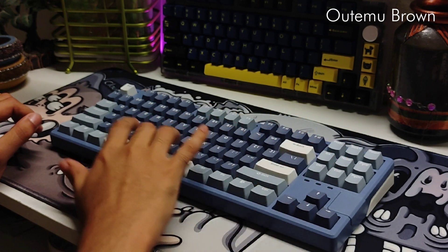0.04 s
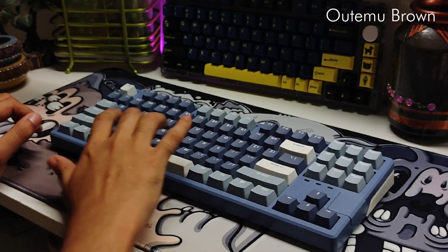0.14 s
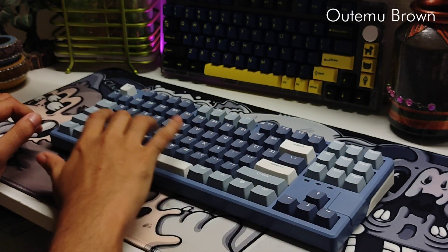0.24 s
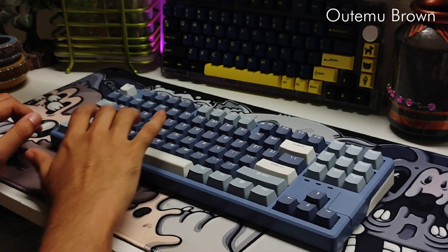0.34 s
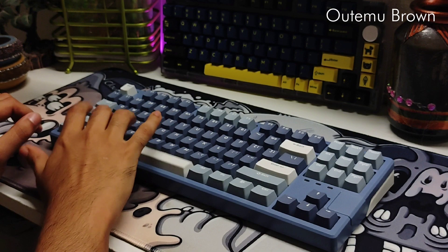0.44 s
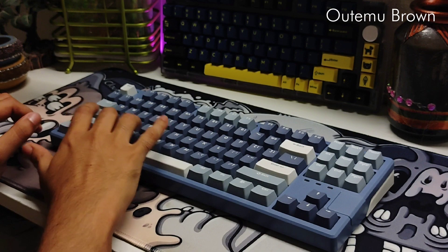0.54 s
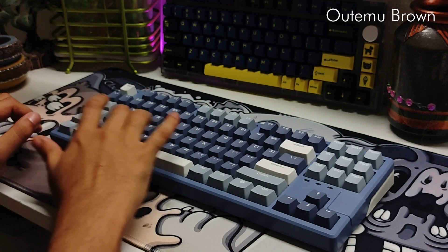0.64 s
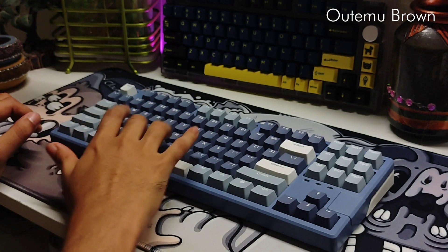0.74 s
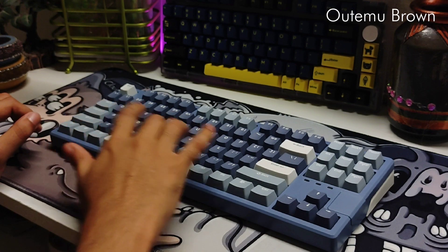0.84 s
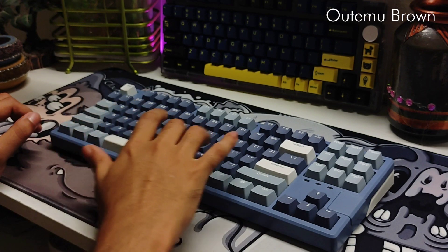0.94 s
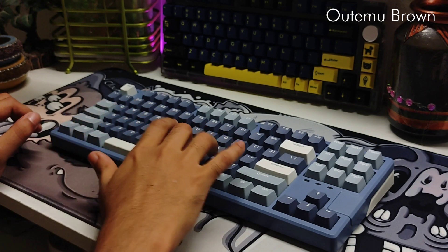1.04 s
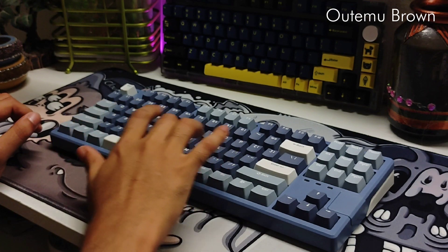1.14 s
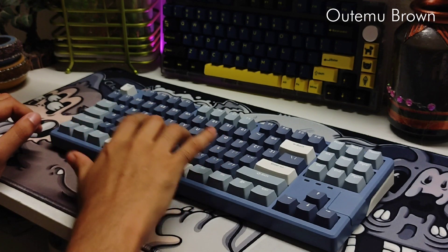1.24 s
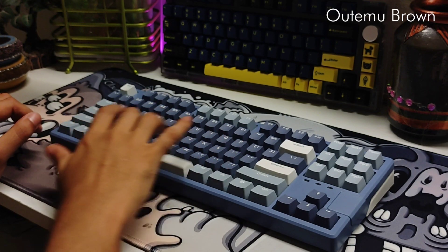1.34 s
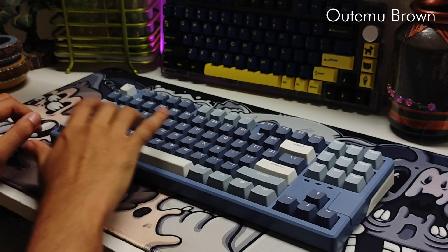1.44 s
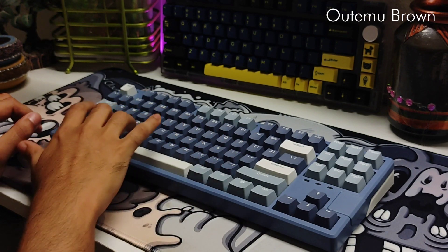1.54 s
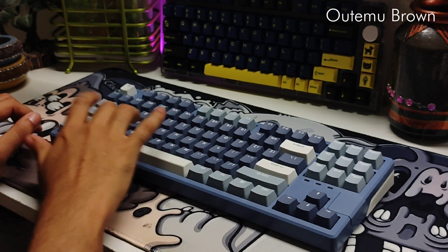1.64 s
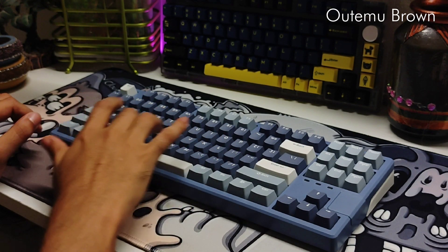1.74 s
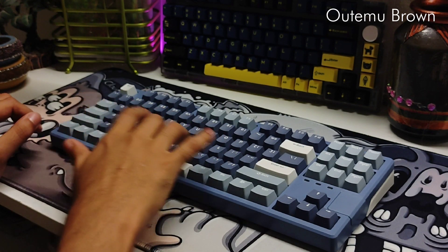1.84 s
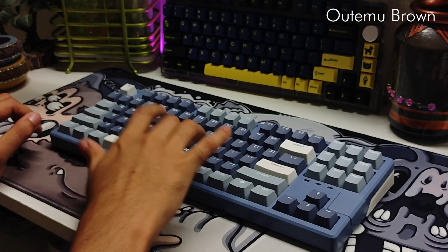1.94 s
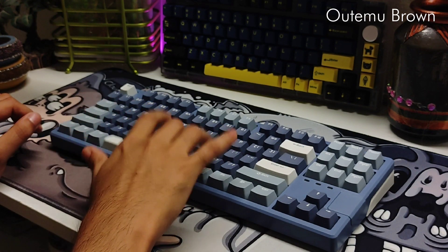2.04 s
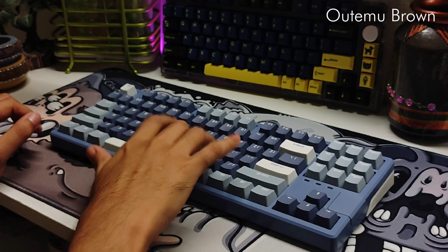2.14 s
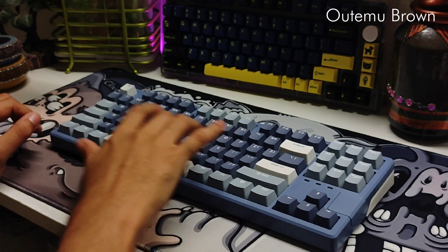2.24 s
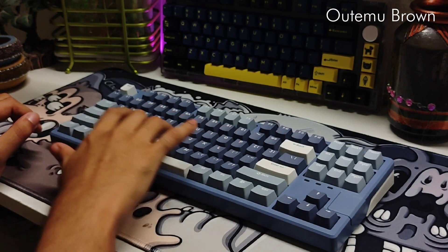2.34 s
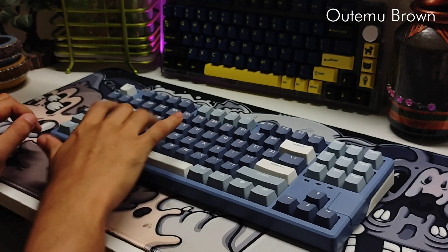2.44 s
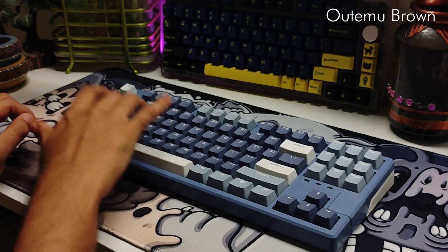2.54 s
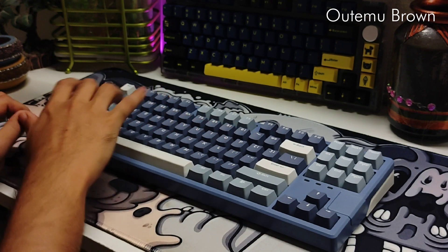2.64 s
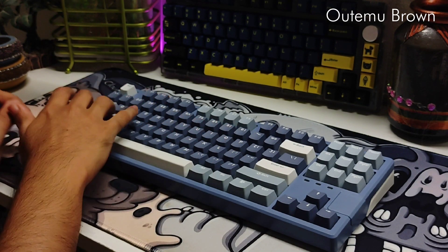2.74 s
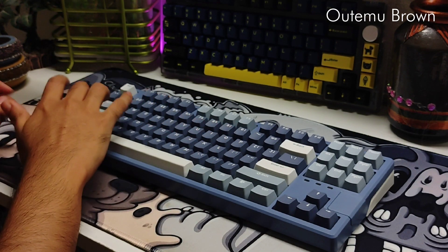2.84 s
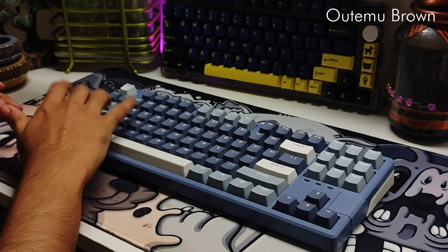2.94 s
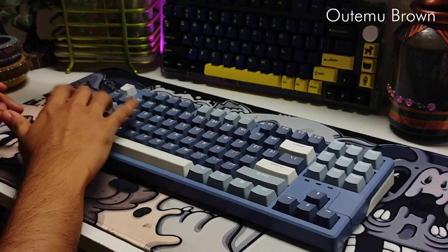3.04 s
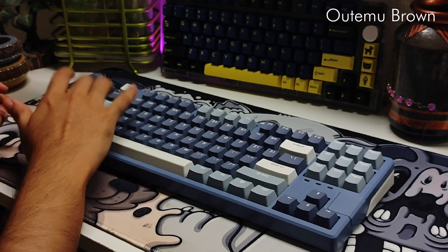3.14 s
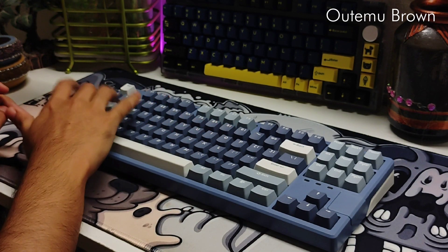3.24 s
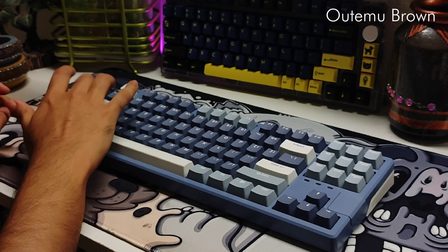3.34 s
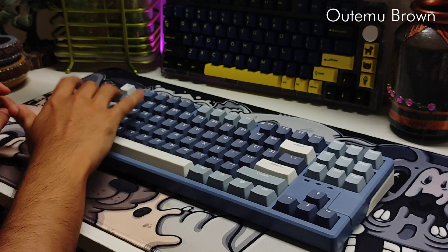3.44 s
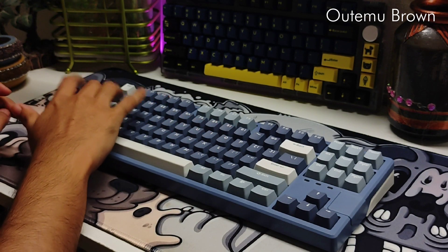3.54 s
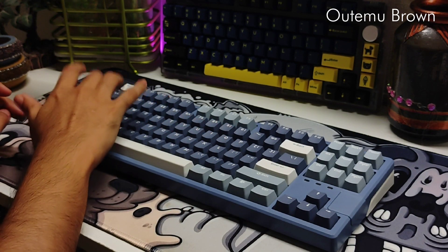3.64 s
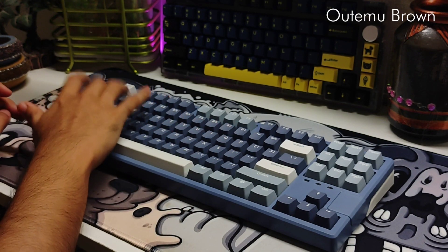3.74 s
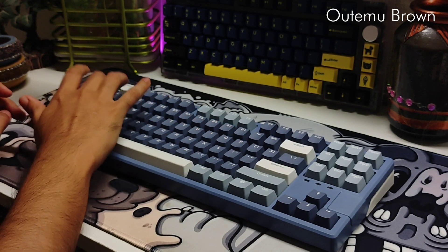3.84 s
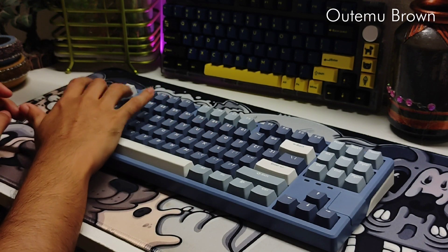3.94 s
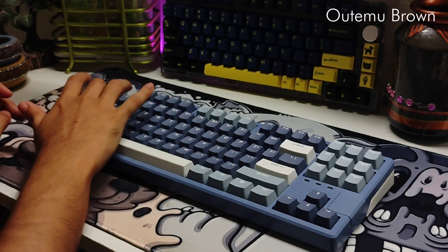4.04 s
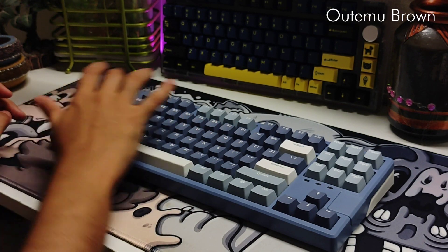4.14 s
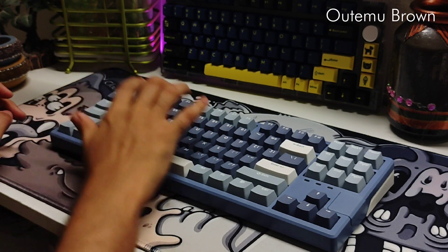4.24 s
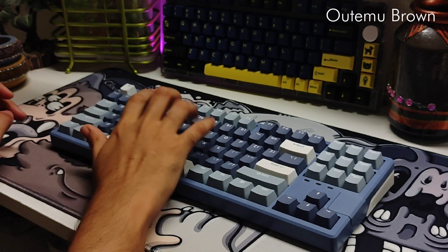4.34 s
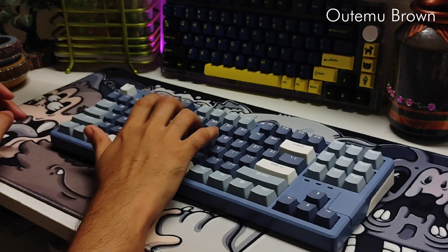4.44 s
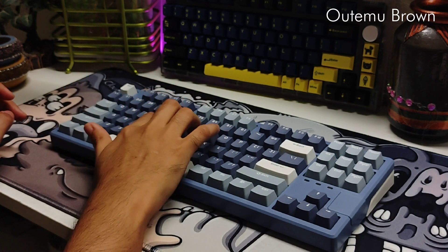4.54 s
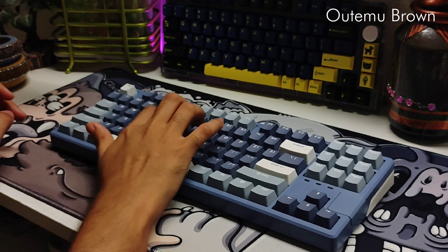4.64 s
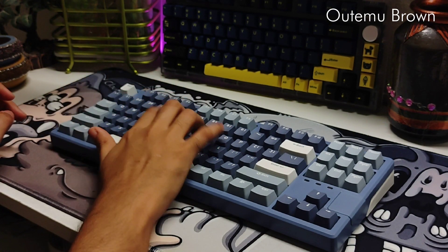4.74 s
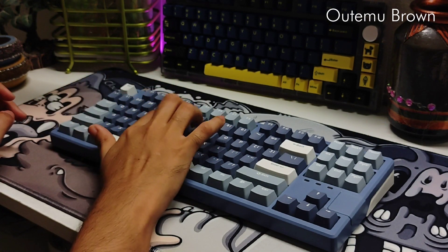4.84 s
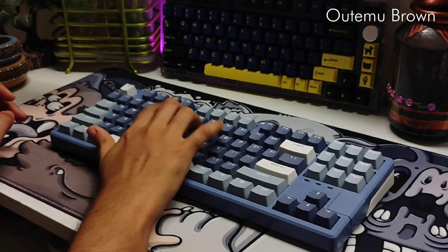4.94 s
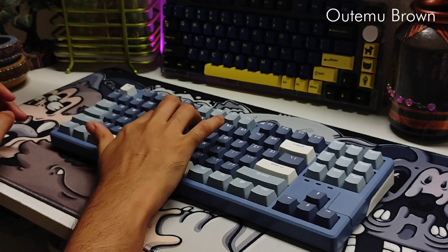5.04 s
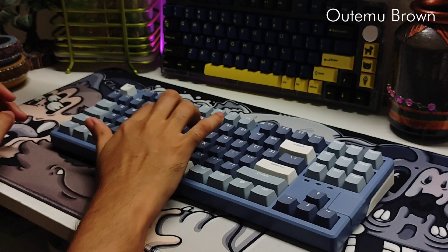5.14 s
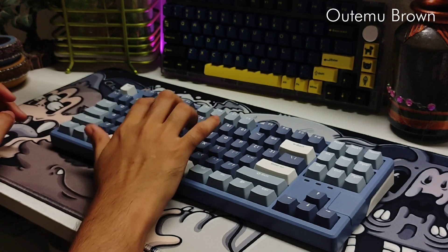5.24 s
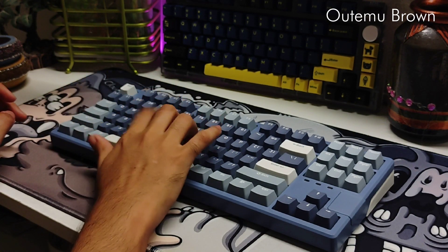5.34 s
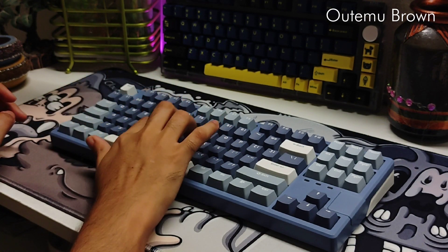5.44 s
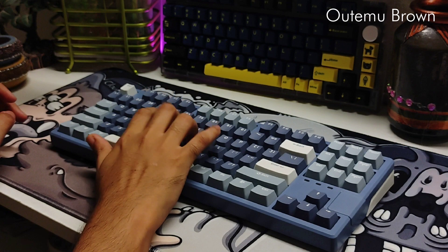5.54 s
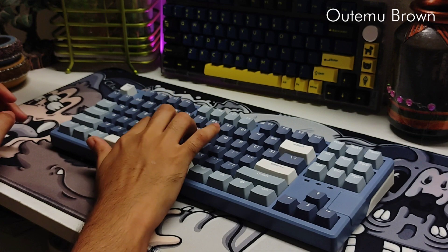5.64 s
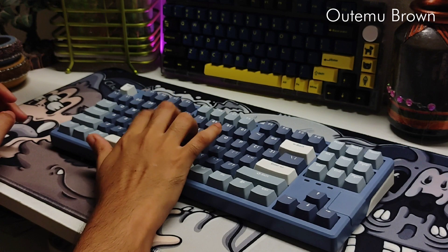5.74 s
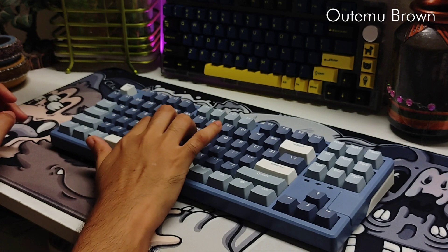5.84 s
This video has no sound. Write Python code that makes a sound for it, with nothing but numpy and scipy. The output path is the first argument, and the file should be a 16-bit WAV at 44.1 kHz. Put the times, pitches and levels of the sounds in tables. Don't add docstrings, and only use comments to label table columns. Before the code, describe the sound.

A mechanical keyboard is tapped with one hand in a quiet room. The long bar is hit about six times a second with full, rattly clacks and sharp returns; then eight crisper top-row strokes, one especially bright; after a brief gap, lighter paired letter taps in bursts. Low case and desk thumps sit beneath. Close mono microphone, short soft room tail, low hum.

```python
import sys
import numpy as np
from scipy import signal
from scipy.fft import rfft, irfft, next_fast_len
from scipy.io import wavfile
from scipy.ndimage import uniform_filter1d

SR = 44100
rng = np.random.default_rng(int(sys.argv[2]) if len(sys.argv) > 2 else 0)


def inscribe(sig):
    pcm = np.round(np.clip(np.atleast_2d(sig).T, -1, 1) * 32767)
    wavfile.write(sys.argv[1], SR, pcm.astype(np.int16))


def attenuation_scalar(level_db):
    decades = np.asarray(level_db, float) / 20
    return 10 ** decades


N = 260171

HAND_MOVES = [2.65, 4.3]
KEY_MOVES = [2.65, 3.72, 4.3]

# [f/Hz, width/Hz, level/dB on the long bar, top row, letters]
CAP_MODES = [(543, 75, 14, 7, 0), (890, 365, 3.5, -2, 2), (1399, 182, 3, -8, -11), (1782, 220, 2, -7, -4),
             (2200, 290, -6, -20, -6.5), (2974, 287, 4.5, -10, 1), (2990, 1050, 2, -9.5, -1.5)]
# [f/Hz, width/Hz, level/dB on the long bar, top row, corner key, letters]
STEM_MODES = [(4250, 420, 16, 12.5, 8, 4), (5190, 140, 12.5, 10, 9, 2.5), (6120, 690, 8, 8.5, 2, 5.5),
              (7400, 770, 10.5, 5, -24, 10.5), (8720, 306, 9.5, 7.5, -9, 15),
              (10290, 240, -25, 8.5, 14.5, -18), (11160, 3300, 6.5, 0, -6.5, -28),
              (13400, 1200, -36.5, -29.5, -23.5, 2)]
# [f/Hz, width/Hz, level/dB on the long bar, top row, corner key, letters]
SPRING_MODES = [(3300, 25, -4, -20, -25, -14), (3390, 12, 0, -20, -25, -14), (4460, 20, -7, -26, -30, -20),
                (5110, 7, -11, -5, -2, -24), (6250, 14, -10, -3, -16, -16), (6625, 8, -14, -14, -2, -20),
                (6705, 5, -12, -10, 0, -18), (6790, 7, -14, -14, -5, -18), (7430, 18, -8, -1, -20, -10),
                (7900, 14, -6, -14, -25, -8), (8520, 10, -12, -14, -20, -3), (8720, 8, -9, -8, -20, 1),
                (9020, 13, -12, -5, -22, -6), (10350, 12, -18, -16, -6, -26)]
# [f/Hz, width/Hz, level/dB on the long bar, top row, letters]
CASE_MODES = [(176, 83, 3, 5, 2), (213.3, 99.5, 3, 2, 3.5), (272.4, 66, -2.5, 0, -4.5),
              (414, 62, -21, -0.5, -16.5)]
# [f/Hz, width/Hz, level/dB on the long bar, top row, letters]
DESK_MODES = [(41, 16, 2, -2.5, 2.5), (55.7, 33, 0, -9, 6.5), (68, 22.6, -3, -3, -3.5),
              (117, 33, -4, -12.5, -20)]

# [f/Hz, 60 dB decay t/s]
ROOM_DECAY = [(200, 0.53), (1000, 0.43), (2500, 0.13), (7000, 0.094), (14000, 0.0076)]
# [f/Hz, level/dB per Hz]
HUM_SPECTRUM = [(20, 7.5), (98, 1), (177, -10.5), (388, -16), (897, -29.5), (1960, -30.5), (3740, -52.5),
                (11800, -71.5)]
# [t/s, level/dB]
RUB_LEVEL = [(0.0, -46), (0.41, -49.5), (0.9, -49), (1.3, -48), (1.45, -46.5), (1.58, -52.5), (1.78, -45),
             (1.93, -48), (2.41, -47.5), (2.6, -49), (3.75, -41.5), (4.4, -56.5), (4.76, -43), (4.98, -49),
             (5.16, -61), (5.3, -50), (5.5, -43), (5.9, -49.5)]
# [f/Hz, width/Hz, level/dB on the long bar, level/dB on the small keys]
RUB_BANDS = [(2620, 4800, 14.5, 4), (6700, 5400, -11, 2), (8020, 2100, 11, -1), (8750, 870, -6.5, -2),
             (12000, 2200, 8.5, -17.5), (14000, 2000, 1.5, -21.5)]

# [t/s, cap clack level/dB, stem tick level/dB, cap ring f/Hz, stem ring f/Hz]
BAR_PRESSES = [(0.0246, -17.5, -29, 2020, 4370), (0.2179, -29.5, -43, 1350, 4270.0),
               (0.3994, -31, -47, 2040, 4430.0), (0.557, -30, -52, 1990, 4400),
               (0.7117, -24, -33.5, 1970.0, 4540.0), (1.0283, -21, -61, 2000, 4440.0),
               (1.2188, -18, -56, 2130, 3970), (1.386, -28, -34.5, 2040, 4200),
               (1.5362, -22, -28.5, 1980, 4250), (1.702, -20.5, -28, 2620, 4300),
               (1.8558, -29, -44, 2210, 4000), (2.0005, -17.5, -68, 2060, 4240.0),
               (2.1652, -15.5, -63, 2740, 4250.0), (2.34, -33.5, -49, 1350, 4110.0),
               (2.4594, -17, -16.5, 2480, 4180)]
# [t/s, cap clack level/dB, stem tick level/dB, cap ring f/Hz, stem ring f/Hz]
BAR_RELEASES = [(0.0725, -17.5, -13, 2480, 6700), (0.3024, -26, -20, 2480.0, 4840),
                (0.482, -33.5, -28, 2750, 3950), (0.6353, -23.5, -18.5, 3140, 4880),
                (0.803, -22, -17.5, 1940, 8250), (0.974, -31, -23, 2720, 6240),
                (1.1295, -27, -17.5, 2070, 6540), (1.3068, -23, -16.5, 2800, 8750.0),
                (1.471, -31.5, -26.5, 3600, 4730), (1.632, -30, -25, 2180, 6660),
                (1.937, -26, -21, 3140, 6640), (2.0777, -19.5, -13.5, 2860, 7960),
                (2.2571, -23.5, -14.5, 1330, 6420), (2.555, -21.5, -15.5, 1370, 5000)]
# [t/s, cap clack level/dB, stem tick level/dB, cap ring f/Hz, stem ring f/Hz]
TOP_PRESSES = [
    (2.748, -12.5, -18.5, 2000, 5020),
    (2.9064, -19, -19, 3450, 4150),
    (3.0528, -15.5, -14, 3580, 4200),
    (3.2644, -19.5, -19, 1910, 4960),
    (3.425, -21.5, -23, 1860, 3800),
    (3.5617, -20.5, -19.5, 1900, 4870),
    (3.771, -15.5, -10, 1900, 6750),
    (3.935, -22.5, -20, 1920, 6630),
]
# [t/s, cap clack level/dB, stem tick level/dB, cap ring f/Hz, stem ring f/Hz]
TOP_RELEASES = [
    (2.8292, -26.5, -23.5, 1760, 9060),
    (2.986, -25.5, -23.5, 1970, 4500),
    (3.142, -18, -17, 1760, 7300),
    (3.3313, -22, -15.5, 1850, 7630),
    (3.4924, -22.5, -17, 2050, 9150),
    (3.6466, -21, -13, 1900, 8870),
    (3.8438, -27, -14, 1730, 6540),
    (4.094, -30.5, -19.5, 1826, 6640),
]
# [t/s, cap clack level/dB, stem tick level/dB, cap ring f/Hz, stem ring f/Hz]
LETTER_PRESSES = [(4.491, -25, -30.5, 1890, 8900), (4.553, -26.5, -36, 2090.0, 7000),
                  (4.7359, -22, -28, 1940, 3740), (4.79, -26, -32, 2070, 8800),
                  (4.9403, -25, -29.5, 2000, 8600), (4.993, -19, -20.5, 2090, 9500),
                  (5.358, -30, -45, 2080, 8650.0), (5.3948, -20, -18.5, 3010, 8500),
                  (5.5851, -26.5, -36, 2050, 8550.0), (5.6328, -28, -38, 2250, 8250),
                  (5.8015, -25, -34.5, 2250, 8300), (5.856, -26.5, -38, 2250, 8500)]
# [t/s, cap clack level/dB, stem tick level/dB, cap ring f/Hz, stem ring f/Hz]
LETTER_RELEASES = [
    (4.613, -29.5, -24, 1890, 8770),
    (4.647, -29, -26, 1900, 6800),
    (4.8405, -28, -18.0, 2200, 8770.0),
    (4.8933, -25, -16.5, 1890, 6900),
    (5.067, -35.5, -28, 2040, 8900),
    (5.1129, -27, -24.5, 2080, 8400),
    (5.4561, -26.5, -20.5, 2050, 8400),
    (5.4952, -29.5, -26, 2200, 6700),
    (5.696, -26.5, -21.5, 2200, 8400),
    (5.7348, -28, -25, 2320, 6670),
]

RATTLE_DECAY = [13, 11, 14, 21, 16.1, 18]
SPRING_LEVEL = [-22.5, -22, -37.5, -26, -29, -22]
# [low level/dB against the clack, high level/dB against the tick]
WASH_LEVEL = [(-29, -28.5), (-33, -37), (-32, -35), (-32.5, -38.5), (-28, -32), (-27.5, -35.5)]

# [t/s, desk boom level/dB, case thump level/dB]
LONG_BAR_THUMPS = [(0.022, -29, -28.5), (0.0717, -40.5, -24.5), (0.2184, -34, -29.5), (0.3031, -37, -25),
                   (0.3994, -38, -28), (0.483, -45, -29), (0.557, -33, -29), (0.6352, -37, -23),
                   (0.711, -35.5, -25), (0.802, -39, -24.5), (0.975, -41, -28), (1.0293, -32.5, -29),
                   (1.1286, -40, -25.5), (1.2177, -31.5, -29), (1.3052, -37, -25), (1.386, -31.0, -28.5),
                   (1.471, -46, -27), (1.5336, -31.5, -25.5), (1.632, -39, -26.5), (1.7, -32, -26),
                   (1.8548, -35.5, -30.5), (1.936, -38, -25.5), (2.0002, -35, -29.5),
                   (2.0781, -37.5, -24.5), (2.1631, -30.5, -26.5), (2.2563, -37, -26), (2.339, -35, -29),
                   (2.4597, -24.5, -24.5), (2.5543, -40, -24.5)]
# [t/s, desk boom level/dB, case thump level/dB]
SMALL_KEY_THUMPS = [(2.748, -29.5, -37.5), (2.8307, -39, -38), (2.9056, -37, -46), (2.9847, -39, -37),
                    (3.0502, -34, -35.5), (3.1412, -45, -33.5), (3.2651, -31, -31.5), (3.3307, -49, -33),
                    (3.424, -30.5, -36.5), (3.4926, -48, -34), (3.5617, -31.5, -39), (3.6472, -45, -34),
                    (3.77, -30.5, -31.5), (3.8434, -45, -35.5), (3.935, -32, -34.5), (4.094, -53, -36),
                    (4.4905, -30, -35.5), (4.552, -37, -39.5), (4.612, -34, -45), (4.6456, -35.5, -42),
                    (4.7383, -28.5, -37), (4.7896, -33, -36), (4.84, -37, -47.5), (4.8923, -38, -37.5),
                    (4.9405, -32.5, -35.5), (4.993, -33, -41), (5.0641, -40.5, -42), (5.114, -44, -44),
                    (5.357, -36.5, -37), (5.393, -32.5, -40.5), (5.4591, -48, -42), (5.4932, -41, -44),
                    (5.5843, -29.5, -35.5), (5.6336, -34, -44), (5.697, -42, -54), (5.734, -43.0, -45.5),
                    (5.8, -29.5, -42.5), (5.8537, -37, -40)]

# [t/s, cap level/dB, stem level/dB, cap ring f/Hz]
BAR_TOUCHES_EARLY = [(0.005, -40, -27.5, 3070), (0.0112, -32.5, -51, 2120), (0.0374, -36, -61, 2990.0),
                     (0.0554, -30, -27, 2840), (0.0962, -41, -33, 2800), (0.1965, -32.5, -28, 2010),
                     (0.325, -48, -47, 1230.0), (0.372, -29, -25.5, 2200), (0.4622, -42, -58, 2140),
                     (0.5247, -42, -40, 2600), (0.5355, -47.5, -56, 2240), (0.6223, -46, -63, 2070.0),
                     (0.647, -42, -50, 3100), (0.6655, -44, -53, 3240), (0.6921, -36, -39, 1900),
                     (0.7815, -39.5, -43, 2010), (0.8266, -48, -52, 3270), (0.866, -45, -58, 1920),
                     (0.942, -50, -57.5, 1920.0), (0.9986, -49, -51, 3320.0), (1.005, -44, -46, 2150.0),
                     (1.0169, -43, -56, 2090.0), (1.1043, -44, -64, 2000), (1.1174, -44, -57, 3220),
                     (1.154, -46, -46, 3340.0), (1.2087, -38, -35, 1900), (1.2307, -57, -50.0, 2240.0),
                     (1.283, -41, -42, 1970), (1.298, -48, -43, 2280)]
# [t/s, cap level/dB, stem level/dB, cap ring f/Hz]
BAR_TOUCHES_LATE = [(1.3315, -49, -47, 2820.0), (1.3635, -32, -26, 1920.0), (1.506, -37.5, -34, 1980.0),
                    (1.6067, -42, -49, 2110.0), (1.673, -61, -40, 2500.0), (1.676, -35.5, -42, 2170.0),
                    (1.776, -46, -45, 2020.0), (1.8205, -62, -45, 2670.0), (1.84, -47, -41, 2280.0),
                    (1.912, -41, -46, 2090.0), (1.96, -51.5, -46, 3210.0), (1.9755, -39.5, -35, 2150.0),
                    (1.9931, -41, -47, 2170.0), (2.057, -42.5, -57, 1770.0), (2.104, -48.5, -49, 3360.0),
                    (2.1457, -42.5, -33.5, 2350.0), (2.158, -31.5, -43.5, 2020.0),
                    (2.2344, -38, -42, 2650.0), (2.2694, -43, -36, 3080.0), (2.283, -47, -52, 3290.0),
                    (2.3172, -45, -40.5, 2500.0), (2.3964, -65, -45, 2220.0), (2.4032, -48.5, -47, 2150.0),
                    (2.4233, -45, -50, 1920.0), (2.4846, -35, -50, 1610.0), (2.4981, -40, -45, 2780.0),
                    (2.5792, -55, -39.5, 1660.0)]
# [t/s, cap level/dB, stem level/dB, cap ring f/Hz]
TOP_ROW_TOUCHES = [(2.7383, -39.5, -61, 1890.0), (2.7407, -48, -36.5, 2480), (2.7636, -55, -51, 1870),
                   (2.784, -44.5, -53, 1870.0), (2.819, -44, -40, 1810.0), (2.888, -41.5, -31.5, 2220.0),
                   (2.9188, -44.5, -54, 3400.0), (2.971, -51, -39.5, 1940), (2.978, -41, -42, 2020.0),
                   (3.0393, -46, -30, 2100), (3.065, -44, -54, 3400.0), (3.0825, -41, -47, 2980),
                   (3.107, -42, -49, 3340.0), (3.1307, -35.5, -54, 2280.0), (3.258, -40, -24.5, 2200.0),
                   (3.283, -54, -58, 1750), (3.357, -48, -47, 1140.0), (3.504, -40.5, -35, 2900),
                   (3.5164, -40.5, -48, 1190), (3.5866, -57.5, -60, 1160.0), (3.638, -42, -52.5, 2110),
                   (3.762, -53.5, -38, 1180.0), (3.7674, -55, -23, 3010.0), (3.797, -46, -46.5, 1160.0),
                   (3.8319, -46, -43.5, 1960.0), (3.852, -42, -35, 2090.0), (3.929, -45, -44, 1850),
                   (4.085, -37, -43, 2990.0)]
# [t/s, cap level/dB, stem level/dB, cap ring f/Hz]
LETTER_KEY_TOUCHES = [(4.4693, -49, -42, 2110), (4.4856, -38, -37, 2820), (4.5079, -47, -56.0, 1910),
                      (4.544, -42, -37, 2040), (4.549, -46, -43, 2200.0), (4.5644, -52, -59.5, 2130.0),
                      (4.593, -48, -45, 2300.0), (4.5992, -36, -34.5, 2100), (4.6214, -38, -30, 2240),
                      (4.7308, -34, -29, 1890), (4.78, -44, -44, 1830.0), (4.783, -41, -30.5, 2330.0),
                      (4.806, -48, -60, 1700.0), (4.8275, -33.5, -27, 1970), (4.8742, -49, -51, 2240.0),
                      (4.9185, -51, -48, 1980.0), (4.9254, -49, -35, 1940.0), (4.9561, -43, -43, 2150.0),
                      (4.987, -44, -39, 1800), (5.0056, -46, -49, 2170.0), (5.0732, -38, -37, 2050),
                      (5.0864, -38, -27, 2150), (5.1016, -46, -38, 2130), (5.3385, -42.5, -37.5, 2360),
                      (5.3466, -41, -34, 3420.0), (5.3502, -34, -40, 2200.0), (5.3869, -37, -29, 3930),
                      (5.4214, -54, -54, 3200), (5.4453, -48, -47, 2200.0), (5.449, -32, -30.5, 2110.0),
                      (5.573, -43, -39, 2350.0), (5.6202, -44, -36, 2200), (5.625, -45, -43, 2260),
                      (5.6895, -35, -33, 2140), (5.7246, -41, -36, 2250), (5.7675, -42, -39, 3060),
                      (5.8438, -50, -38, 2200), (5.8484, -36, -36, 2270)]

SIZE = 12288
HZ = np.arange(SIZE // 2 + 1) * SR / SIZE
AGE = np.arange(SIZE) / SR
STEP = np.exp(-2j * np.pi * HZ / SR)

ROOM_DB, HUM_DB = -19, -45
RATTLE_SHAPE = 0.94
HOP_SHARE, HOP_DB = 0.2, -10
RATTLE_PER_CLACK, MEAN_CLACK_DB = -0.25, -24
COIL_BUZZ_S, COIL_STEADY = .006, .68
WASH_LOW_T60_S, WASH_HIGH_T60_S = 0.44, 0.38
SLIDE_S, SLIDE_DB = 0.0014, -30.5


def hum():
    size = next_fast_len(N)
    hz = np.arange(1, size // 2 + 2) * SR / size
    corner_hz, corner_db = np.transpose(HUM_SPECTRUM)
    colour = attenuation_scalar(np.interp(np.log(hz), np.log(corner_hz), corner_db))
    noise = irfft(rfft(rng.standard_normal(size)) * colour, size)[:N]
    return noise * attenuation_scalar(HUM_DB) / np.std(noise)


def rub():
    hiss = 0
    for hz, width, bar_db, small_db in RUB_BANDS:
        db = np.where(np.arange(N) < HAND_MOVES[0] * SR, bar_db, small_db)
        flicker = np.repeat(rng.standard_normal(N // 800 + 1), 800)[:N]
        flicker = uniform_filter1d(flicker, 800)
        band = signal.iirpeak(hz, hz / width, fs=SR)
        hiss = hiss + attenuation_scalar(db + 3.5 * flicker) * signal.filtfilt(*band, rng.standard_normal(N))
    level_db = np.interp(np.arange(N) / SR, *np.transpose(RUB_LEVEL)) - 12.0
    return hiss / np.std(hiss) * attenuation_scalar(level_db)


def resonance(hz, width):
    pole = np.exp((2j * hz - width) * np.pi / SR)
    return (1 - abs(pole)) * (1 - STEP ** 2) / (1 - 2 * pole.real * STEP + abs(pole) ** 2 * STEP ** 2)


def body(modes, s, scatter_db, detune, moves_s=HAND_MOVES):
    hz, width, *db = np.transpose(modes)[:, :, None]
    db = np.array(db)[np.searchsorted(moves_s, s) % len(db)]
    chance = rng.standard_normal((len(s), len(modes), 2))
    sign = (-1) ** np.arange(len(modes))[:, None]
    gain = sign * attenuation_scalar(db + scatter_db * chance[..., :1])
    return np.sum(gain * resonance(hz * (1 + detune * chance[..., 1:]), width), axis=1)


def ring(force, response, peak_db, window_s):
    y = irfft(rfft(force, SIZE) * response, SIZE)
    power = uniform_filter1d(2 * y ** 2, int(window_s * SR), axis=1, mode="constant")
    y[:, -SIZE // 4:] *= np.linspace(1, 0, SIZE // 4)
    return y * attenuation_scalar(peak_db)[:, None] / np.sqrt(power.max(axis=1, keepdims=True))


def rattle(decay_s, spiky_db, first_db, rise_s):
    shape = (len(decay_s), SIZE)
    noise = rng.standard_normal(shape)
    spikes = attenuation_scalar(spiky_db * rng.exponential(size=shape))
    envelope = attenuation_scalar(-60 * (AGE / decay_s[:, None]) ** RATTLE_SHAPE) * np.tanh(AGE / rise_s)
    force = noise * spikes * envelope
    force[:, 0] += attenuation_scalar(first_db)
    hop = (decay_s * SR * HOP_SHARE * (1 + np.tanh(noise[:, 1]) / 2)).astype(int)
    force[np.arange(len(hop)), hop] += attenuation_scalar(first_db + HOP_DB)
    tones = rfft(force)
    even = irfft(tones / np.sqrt(uniform_filter1d(abs(tones) ** 2, size=66, axis=1)))
    even[:, SIZE // 2:] = 0
    return even


def place(times, sounds):
    out = np.zeros(N + SIZE)
    for start, sound in zip((times * SR).astype(int), sounds):
        out[start:start + SIZE] += sound
    return out[:N]


def touches():
    rows = BAR_TOUCHES_EARLY + BAR_TOUCHES_LATE + TOP_ROW_TOUCHES + LETTER_KEY_TOUCHES
    s, cap_db, stem_db, cap_hz = np.transpose(rows)
    force = rattle(np.full(len(s), .014), 0.59, 7.7, 0.0001)
    cap_body = body(CAP_MODES, s, 2.5, 0.02)
    cap_body = cap_body + attenuation_scalar(12.5) * resonance(cap_hz[:, None], 170)
    cap = ring(force, cap_body * resonance(1200, 4800), cap_db, 0.0045)
    stem_body = body(STEM_MODES, s, 1.6, 0.068, KEY_MOVES)
    stem = ring(force, stem_body * resonance(5900, 9000), stem_db, 0.0004)
    return place(s, cap + stem)


def push(delay_s, length_s):
    return np.sin(np.pi * np.clip((AGE - delay_s) / length_s, 0, 1)) ** 2


def bending(lag_s):
    return np.exp(-4j * np.pi * lag_s * np.sqrt(100 * HZ))


def thumps():
    s, desk_db, case_db = np.transpose(LONG_BAR_THUMPS + SMALL_KEY_THUMPS)
    hollow = body(CASE_MODES, s, 1.2, .025)
    shuffle = attenuation_scalar(-9.0) * uniform_filter1d(rng.standard_normal((len(s), SIZE)), size=30)
    shuffle = shuffle * attenuation_scalar(-60 * AGE / 0.32) * np.tanh(AGE / 0.0047) ** 2
    hollow = hollow * resonance(219, 210) ** 2 * bending(0.00087)
    case = ring(push(0, 0.0011) + shuffle, hollow, case_db, 0.0054)
    boards = body(DESK_MODES, s, 3, .06)
    desk = ring(push(0.002, 0.0062), boards * resonance(53.0, 45), desk_db, 0.037)
    return place(s, case + desk)


def typing():
    tables = BAR_PRESSES, BAR_RELEASES, TOP_PRESSES, TOP_RELEASES, LETTER_PRESSES, LETTER_RELEASES
    rows = []
    for kind, table in enumerate(tables):
        shared = (RATTLE_DECAY[kind], SPRING_LEVEL[kind], *WASH_LEVEL[kind])
        rows += [(*stroke, *shared) for stroke in table]
    return np.transpose(rows)


def wash():
    s, cap_db, stem_db, cap_hz, stem_hz, _, _, low_db, high_db = typing()
    noise = rng.standard_normal((len(s), 2, SIZE))
    swell = np.tanh(AGE / 0.0028)

    caps = resonance(np.maximum(cap_hz, 1800)[:, None], 1100)
    on_bar = (s < HAND_MOVES[0])[:, None]
    caps = caps - on_bar * resonance(3270, 500)
    low = ring(noise[:, 0] * swell * attenuation_scalar(-60 * AGE / WASH_LOW_T60_S), caps, cap_db + low_db, 0.036)

    high_hz = np.where(s > HAND_MOVES[1], 8500, stem_hz)
    springs = resonance(high_hz[:, None], 2600) ** 2
    high = ring(noise[:, 1] * swell * attenuation_scalar(-60 * AGE / WASH_HIGH_T60_S), springs, stem_db + high_db, 0.011)

    scrape = noise[:, 0, ::-1] * (AGE < SLIDE_S) * (AGE / SLIDE_S) ** 2
    slide = ring(scrape, resonance(2400, 6000), np.maximum(cap_db, stem_db) + SLIDE_DB, 0.0022)
    return place(s, low + high) + place(s - SLIDE_S, slide)


def strokes():
    s, cap_db, stem_db, cap_hz, stem_hz, rattle_ms, spring_db = typing()[:7]
    decay_ms = rattle_ms * attenuation_scalar(RATTLE_PER_CLACK * (cap_db - MEAN_CLACK_DB))
    force = rattle(np.clip(decay_ms, 5, 60) / 1000, 1.52, 17.0, .0001)
    cap_body = body(CAP_MODES, s, 1.5, .02)
    cap_body = cap_body + attenuation_scalar(1.0) * resonance(cap_hz[:, None], 320 + 0.014 * cap_hz[:, None])
    stem_body = body(STEM_MODES, s, 2, 0.02, KEY_MOVES)
    stem_body = stem_body + attenuation_scalar(16.0) * resonance(stem_hz[:, None], 240)
    cap_body = cap_body * resonance(1100, 4900) ** 2
    stem_body = stem_body * resonance(5700, 8200)
    clack = ring(force, cap_body, cap_db, 0.002)
    tick = ring(force, stem_body, stem_db, 0.00064)
    spring = ring(force, body(SPRING_MODES, s, 3.5, .0025, KEY_MOVES), stem_db + spring_db, .005)
    flutter = uniform_filter1d(rng.standard_normal(spring.shape), int(COIL_BUZZ_S * SR))
    spring = spring * (COIL_STEADY + (1 - COIL_STEADY ** 2) ** .5 * flutter / flutter.std())
    return place(s, clack + tick + spring)


def room(x):
    age = np.arange(SR // 2) / SR
    decay_hz, decay_s = np.transpose(ROOM_DECAY)
    tail = 0
    for hz in 100 * 2 ** np.arange(0, 7.3, .5):
        t60 = np.interp(np.log(hz), np.log(decay_hz), decay_s)
        band = signal.butter(2, [hz / 2 ** .25, hz * 2 ** .25], "band", fs=SR, output="sos")
        tail = tail + signal.sosfilt(band, rng.standard_normal(len(age))) * attenuation_scalar(-60 * age / t60)
    tail = tail * np.clip((age - .004) / 0.00043, 0, 1)
    return attenuation_scalar(ROOM_DB) * signal.fftconvolve(x, tail / np.sqrt(np.sum(tail ** 2)))[:N]


def scene():
    clicks = strokes() + touches() + wash()
    lows = thumps()
    echoes = room(clicks + attenuation_scalar(-10) * lows)
    return (clicks + lows + rub() + echoes + hum())[None]


def band_limit(x):
    return signal.sosfilt(signal.butter(12, 16520, fs=SR, output="sos"), x)


def record(dry):
    mix = signal.sosfilt(signal.butter(2, 36, "high", fs=SR, output="sos"), dry)
    mix = signal.sosfilt(signal.butter(7, 14800, fs=SR, output="sos"), mix)
    return band_limit(mix)


dry = scene()
out = record(dry)
inscribe(out)
```